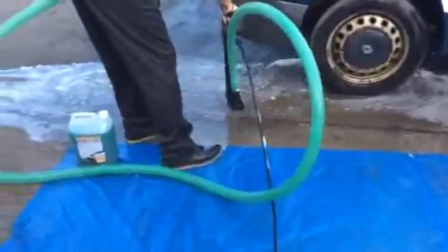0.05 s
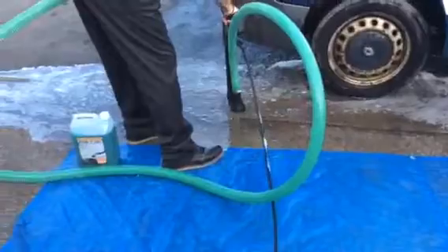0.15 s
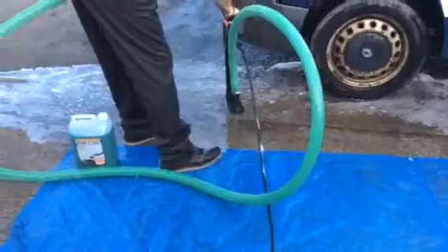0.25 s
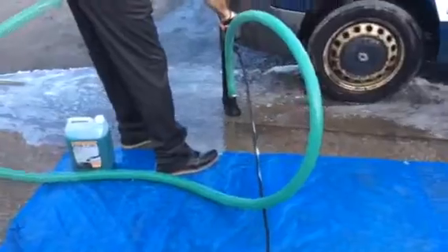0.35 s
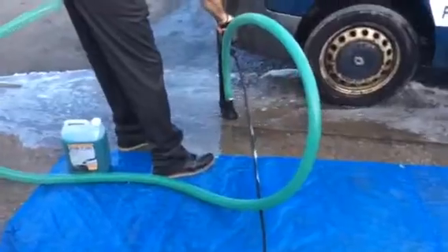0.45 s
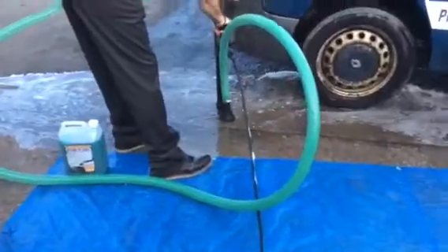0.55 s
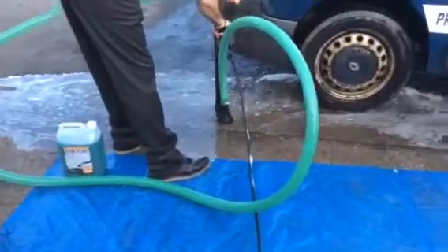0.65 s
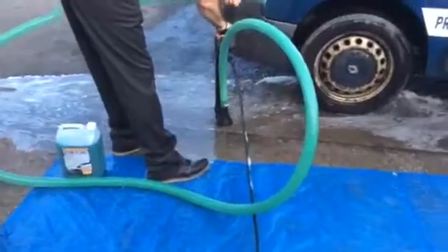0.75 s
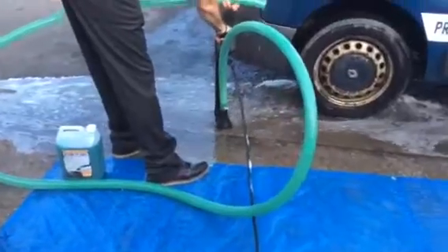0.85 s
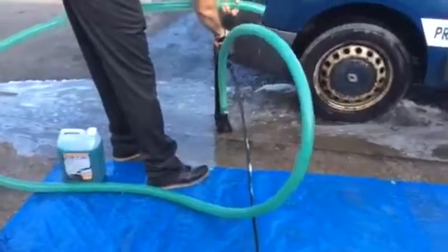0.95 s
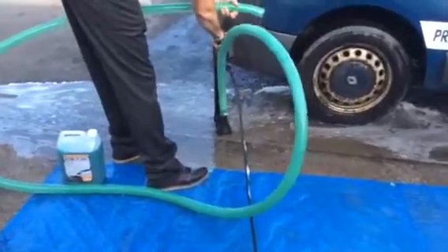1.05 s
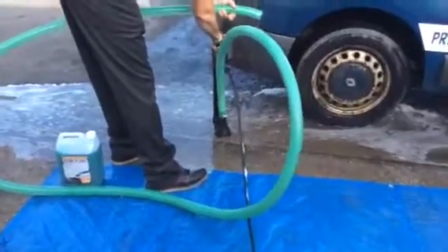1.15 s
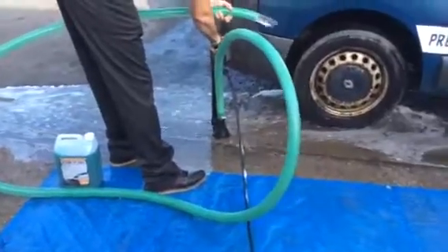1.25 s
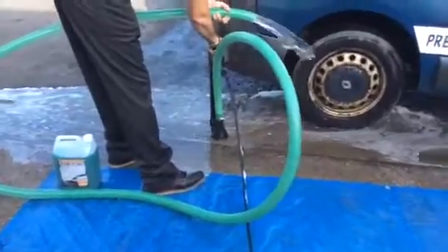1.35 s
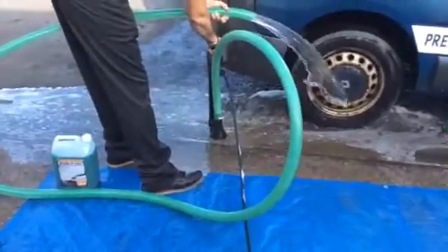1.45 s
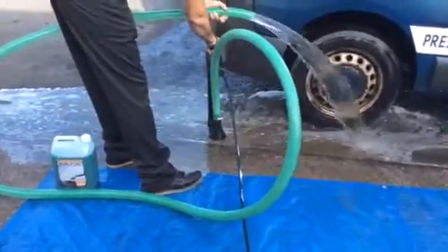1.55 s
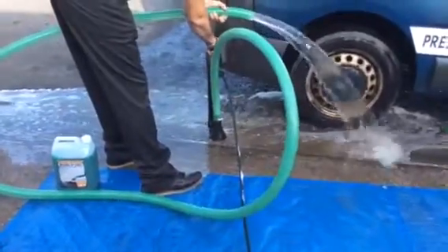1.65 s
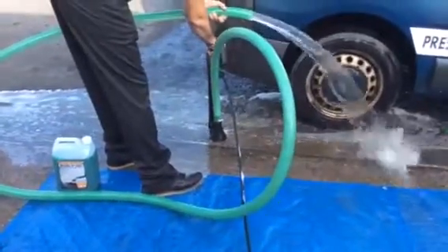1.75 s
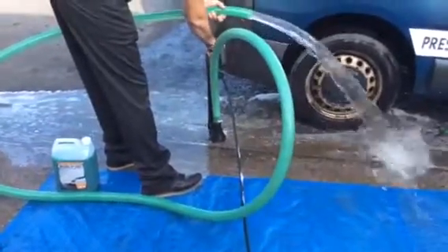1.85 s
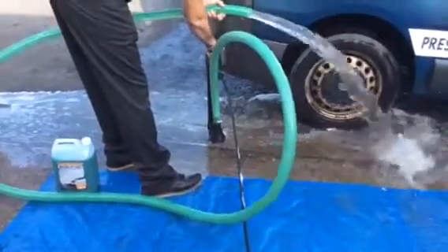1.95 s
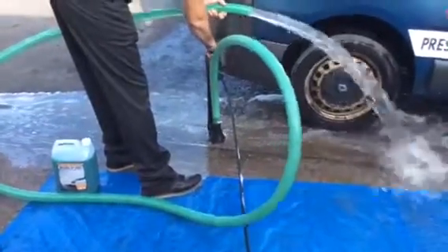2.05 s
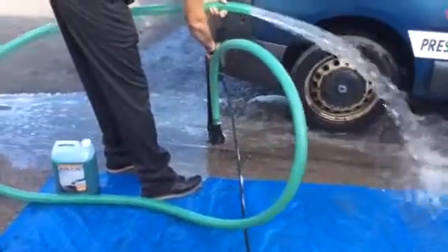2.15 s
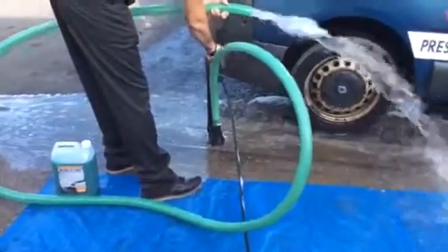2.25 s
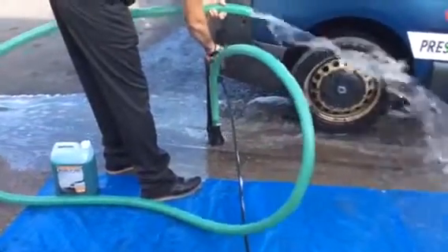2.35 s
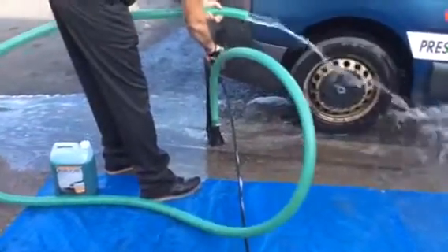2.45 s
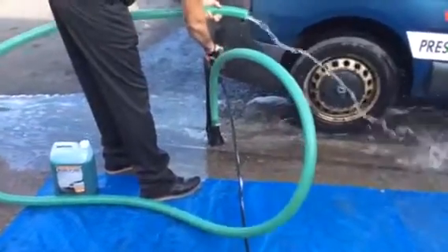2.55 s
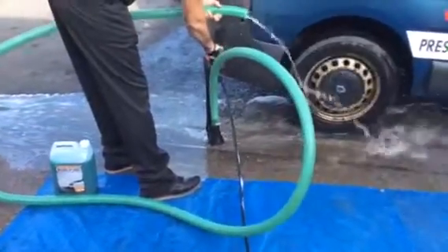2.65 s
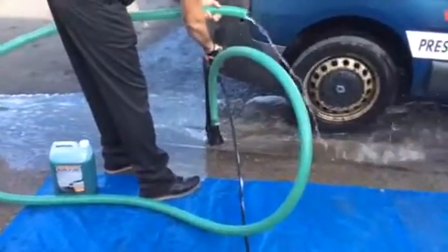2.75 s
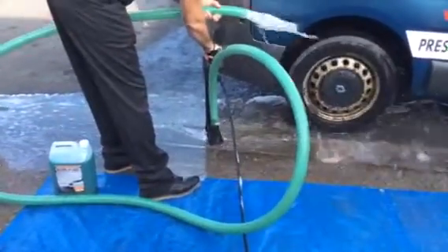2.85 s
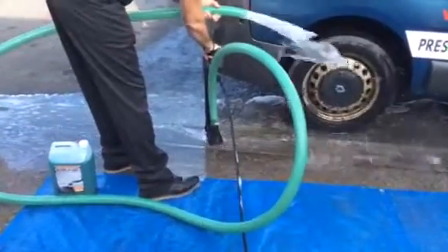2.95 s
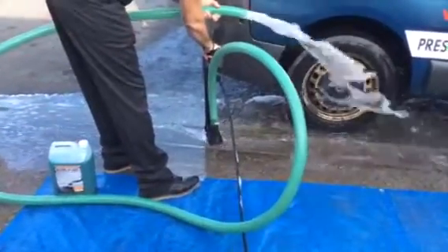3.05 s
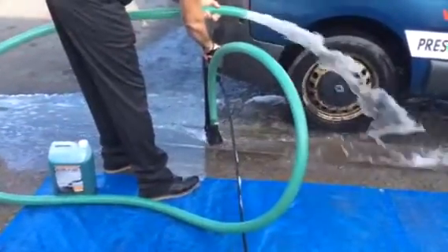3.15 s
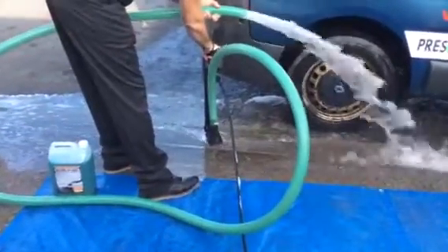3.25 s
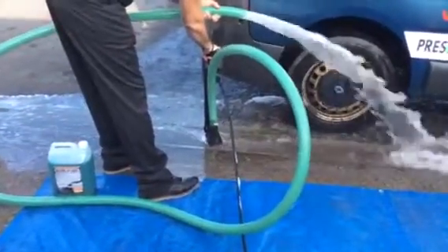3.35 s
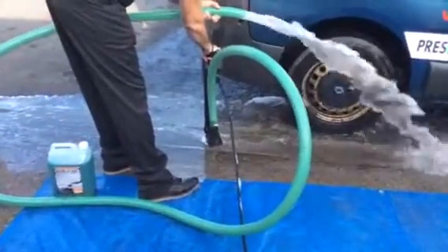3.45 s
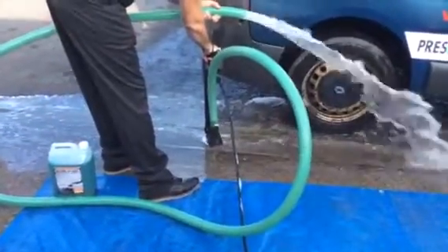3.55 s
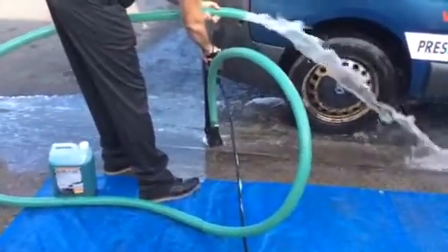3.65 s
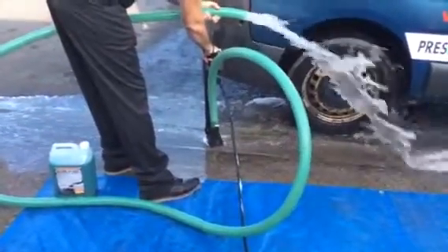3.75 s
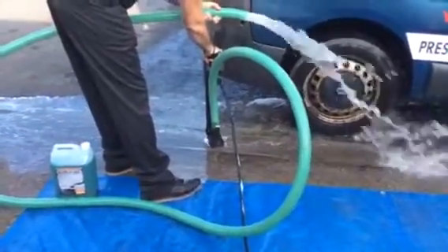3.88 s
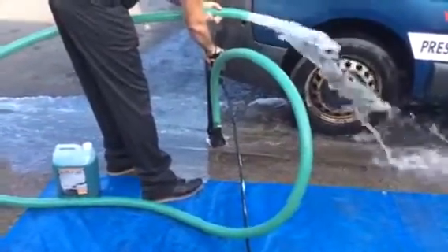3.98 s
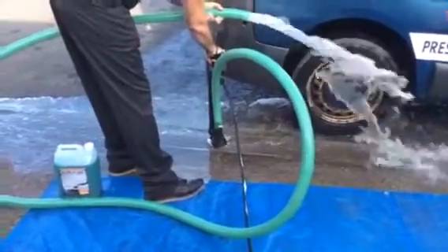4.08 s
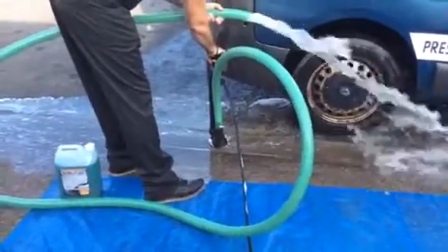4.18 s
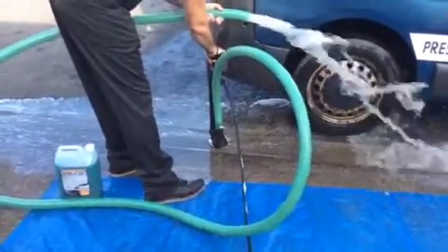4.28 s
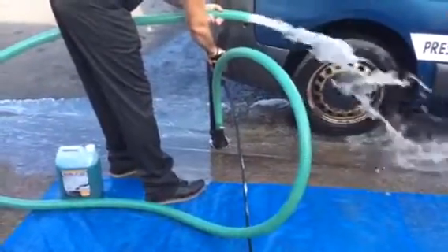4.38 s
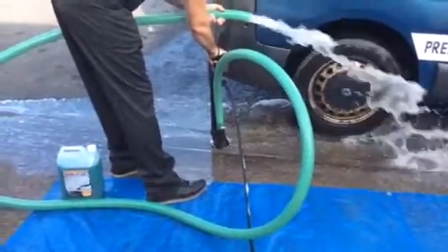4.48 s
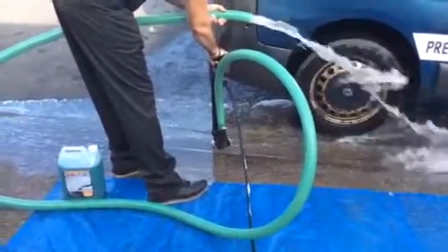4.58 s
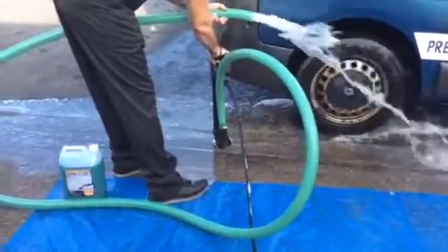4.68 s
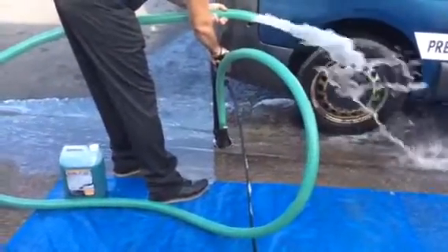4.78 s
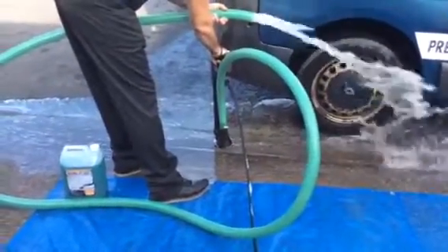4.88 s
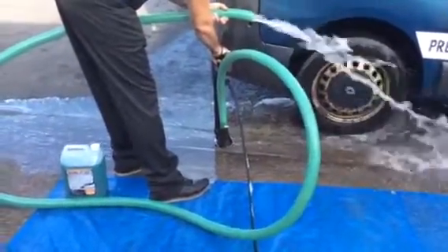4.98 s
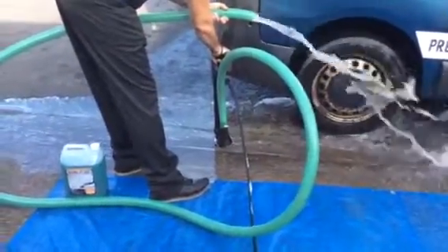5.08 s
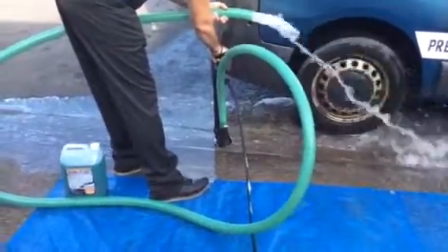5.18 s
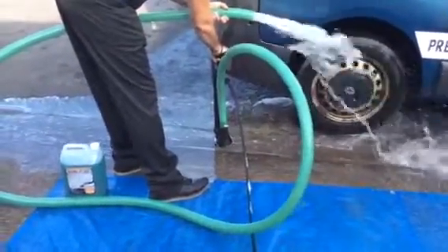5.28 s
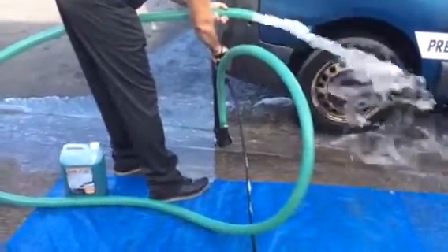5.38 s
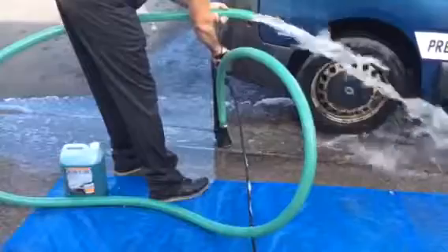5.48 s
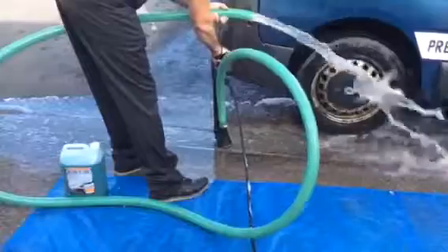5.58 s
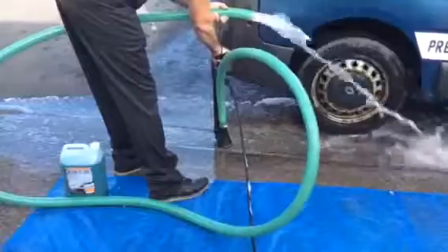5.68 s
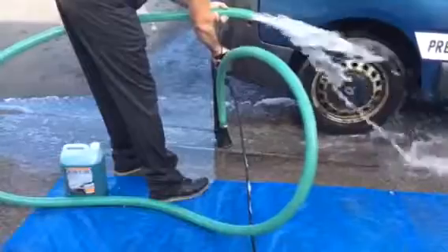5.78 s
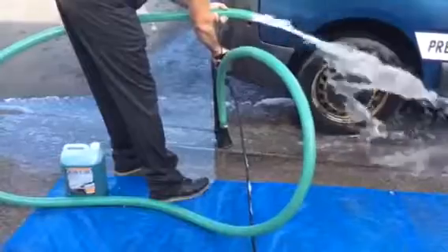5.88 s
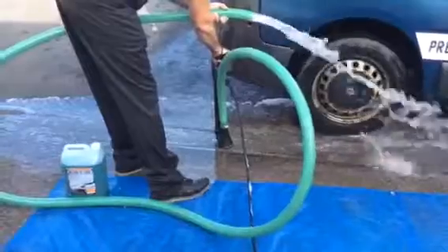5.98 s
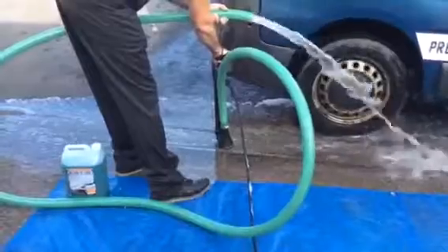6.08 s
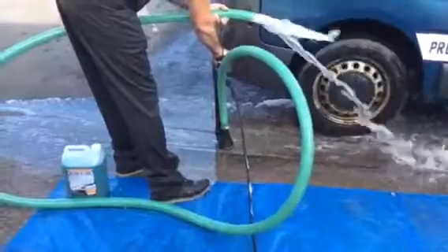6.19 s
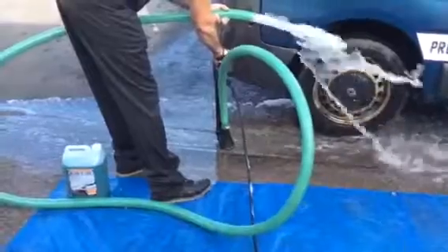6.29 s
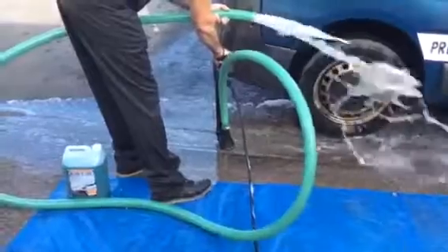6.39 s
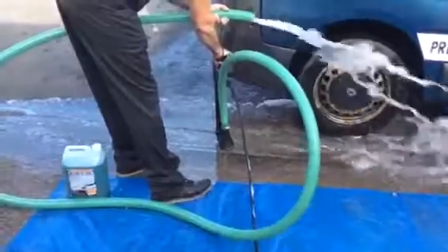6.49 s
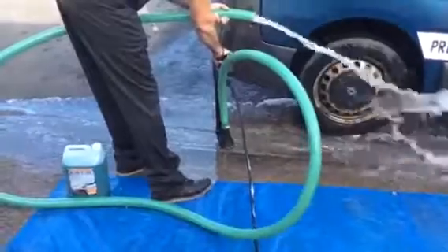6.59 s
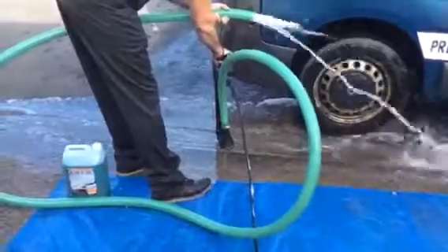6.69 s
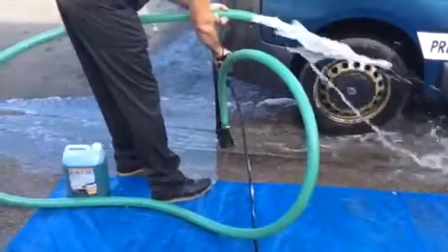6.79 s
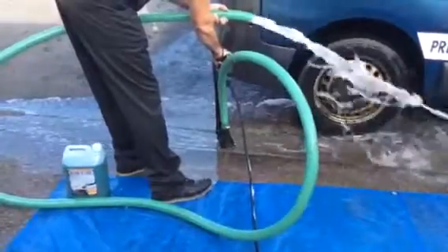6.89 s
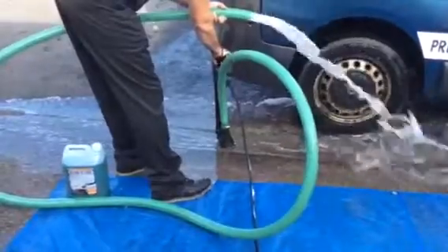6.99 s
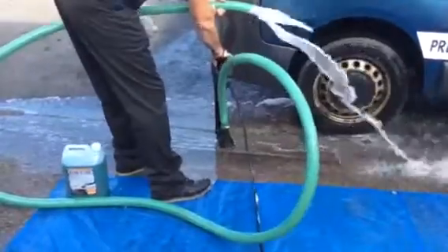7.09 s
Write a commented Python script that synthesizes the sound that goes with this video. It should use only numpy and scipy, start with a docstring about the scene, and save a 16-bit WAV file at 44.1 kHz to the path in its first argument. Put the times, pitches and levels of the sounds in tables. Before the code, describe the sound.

A pressure washer whines and hisses outdoors while a hose coughs out air, then gushes water that splatters onto wet ground.

```python
"""A pressure washer whines and hisses steadily outdoors, over a low rumble and a few soft bumps.
The motor sounds a comb of shaft harmonics; the jet, inside a sludge pump, throbs with the pistons.
Trapped air coughs out of the pump's wide hose, then water follows, gushing and splattering on wet
ground while more air pockets burst from the hose mouth in short squelches."""
import sys
import numpy as np
from scipy import signal
from scipy.fft import rfft, irfft
from scipy.io import wavfile
from scipy.ndimage import uniform_filter1d

SR = 44100
rng = np.random.default_rng(int(sys.argv[2]) if len(sys.argv) > 2 else 0)


def bounce(signal):
    """Save signal as a 16-bit WAV file at the path given by the first command-line argument."""
    frames = np.transpose(np.atleast_2d(signal))
    limited = np.clip(frames, -1, 1)
    pcm = np.round(limited * 32767).astype(np.int16)
    wavfile.write(sys.argv[1], SR, pcm)


N = 314433
TIME_S = np.arange(N) / SR
SHAFT_HZ, HOSE_RING_HZ = 47.28, 2050

# outdoor rumble spectrum: f/Hz, level/dB
RUMBLE_SPECTRUM = [(28, -36), (40, -11), (55, 2), (80, -5.5), (120, 0), (200, 0.5), (300, -1), (420, -6.5),
                   (700, -21), (3000, -70)]
# soft low bumps: t/s, level/dB, f/Hz, decay/s
BUMP_EVENTS = [(0.0, -42, 200, 0.027), (0.065, -38, 201, .07), (0.135, -37, 115, .02),
               (0.365, -41, 160, .015), (0.408, -36.5, 141, .02), (0.689, -31, 130, .008),
               (0.903, -37, 221, .012)]
# motor and piston pump lines: shaft harmonic, level/dB
WHINE_LINES = [(1, -29), (2, -20), (3, -21.5), (4, -19.5), (5, -24), (6, -19.5), (7, -19.5), (8, -22.5),
               (9, -33), (10, -15.5), (11, -9), (12, -29), (13, -1.5), (14, -4), (15, -8.5), (16, -10.5),
               (17, -1), (18, -13), (19, -36), (20, -24), (21, -8), (22, -25), (23, -13), (24, -25),
               (25, -15), (26, -13), (27, -10.5), (28, -13.5), (29, -3.5), (30, -22), (31, -0.5),
               (32, -4.5), (33, -9), (34, -3), (35, -8.5), (36, -19), (37, -25), (38, -11.5), (39, -31),
               (40, -9), (41, -5), (42, -13), (43, -4), (44, -25), (45, -21), (46, -4.5), (47, -18),
               (48, -19), (49, -3.5), (50, -28), (51, -26), (52, -8), (53, -18), (54, -18), (55, -14.5),
               (56, -17), (57, -13), (58, -10.5), (59, -15), (60, -18), (61, -17), (62, -10.5), (63, -16),
               (64, -16)]
# sparse upper lines: shaft harmonic, level/dB
WHINE_TOP_LINES = [(79, -15), (83, -18), (84, -14.5), (92, -15), (117, -13), (124, -16), (138, -28)]
# valve chatter spectrum: f/Hz, level/dB
VALVE_SPECTRUM = [(1500, -32), (2800, -9), (3300, -0.5), (4300, -3), (6400, -0.5), (9400, -8)]
# jet hiss spectrum: f/Hz, level/dB
JET_SPECTRUM = [(400, -10.5), (620, 1.5), (1100, -0.5), (2200, 5), (3200, -1.5), (4200, 1.7), (5000, -1),
                (6300, -0.8), (8000, -4), (9600, 2), (12200, -.5), (13400, 4), (15200, 3.5)]
# stream envelope: t/s, gush level/dB, spray level/dB
FLOW_ENVELOPE = [(0.95, -70, -70), (1.03, -37.5, -52), (1.18, -30.5, -32.5), (1.36, -33, -45),
                 (1.75, -27.5, -32), (2.1, -28.5, -34.0), (2.35, -25.5, -31.0), (2.58, -27.5, -28.5),
                 (2.72, -32.0, -33.5), (3.04, -32, -37.5), (3.25, -28.5, -30.5), (3.97, -29.5, -33),
                 (4.68, -27.0, -29.5), (4.98, -31.5, -33.5), (5.1, -27, -29.5), (5.97, -30.5, -36),
                 (6.18, -26.5, -29.5), (6.96, -27.5, -31), (7.13, -35.5, -35.5)]
# spectrum of water leaving the hose: f/Hz, level/dB
GUSH_SPECTRUM = [(80, -36), (200, -24), (420, -12.5), (520, -5.5), (800, -2), (1100, -2.5), (1500, 1),
                 (1750, -4), (2200, 1.5), (2550, -3.5), (3300, -8), (4500, -15.5), (7000, -30)]
# spectrum of splattering drops: f/Hz, level/dB
SPRAY_SPECTRUM = [(300, -40), (1500, -1), (3000, -2), (4000, 0), (4800, -1.5), (5600, 2), (6800, -4),
                  (9000, -7), (12000, -11.5), (15000, -5.5)]
# loud air pockets: t/s, level/dB, f/Hz, length/s
LOUD_POCKETS = [(0.821, -23.5, 1150, 0.015), (0.836, -19.5, 796, .009), (0.871, -19, 3950, 0.0085),
                (0.895, -13.5, 2290, 0.011), (0.917, -14, 2250, .011), (1.173, -17.5, 1156, 0.0102),
                (1.175, -19.5, 2250, 0.0086), (1.215, -25, 850, .011), (1.231, -21, 2500, .009),
                (1.597, -21.5, 2100, 0.0087), (1.749, -21, 2100, 0.0085), (1.985, -13.5, 1550, .011),
                (2.85, -19.5, 2000, 0.014), (2.965, -21, 2200, .01), (3.059, -19.5, 1680, 0.0048),
                (3.107, -16, 2000, 0.01), (3.247, -13.5, 2310, 0.0074), (3.389, -27, 5470, .008),
                (3.482, -20, 2280, 0.0092), (3.738, -22, 2280, .007), (3.848, -18, 2200, 0.0085),
                (3.877, -20.5, 1160, 0.01), (3.903, -23, 2765, 0.0088), (4.064, -19.5, 2280, .009),
                (4.162, -17.5, 2110, 0.0066), (4.199, -20.5, 2200, .008), (4.316, -21, 1590, 0.0072),
                (4.352, -20.5, 1160, .01), (4.463, -19.5, 2280, .011), (4.685, -17, 2070, 0.0096),
                (4.721, -18.5, 3190, 0.011), (5.069, -18, 2294, 0.0088), (5.16, -16.5, 2240, 0.0083),
                (5.321, -15, 2300, .009), (5.463, -19, 2240, 0.0089), (5.596, -21.5, 979, .014),
                (5.795, -22.5, 2110, .013), (6.061, -22.5, 1160, 0.0099), (6.215, -22, 1590, .018),
                (6.232, -17.5, 2000, 0.02), (6.284, -18.5, 2240, 0.0058), (6.365, -14, 2306, 0.0092),
                (6.476, -25, 1030, .012), (6.666, -17, 2240, 0.016), (6.764, -21.5, 2650, .011),
                (6.924, -22, 900, .01), (6.931, -18.5, 2454, 0.0075), (6.994, -21, 1980, .015),
                (7.093, -19, 3890, .006)]


def from_db(db):
    return 10 ** (np.asarray(db) / 20)


def unit_rms(x):
    return x / np.sqrt(np.mean(x ** 2) + 1e-20)


def colour(x, spectrum):
    """Filter by a spectrum interpolated over log frequency; rms 1."""
    hz, db = np.transpose(spectrum)
    bin_hz = np.maximum(np.arange(N + 1) * SR / (2 * N), 1)
    gain = from_db(np.interp(np.log(bin_hz), np.log(hz), db))
    return unit_rms(irfft(rfft(x, 2 * N) * gain)[:N])


def drift(corner_hz):
    """Slow low-passed noise; rms about 1."""
    hop = 40
    r = np.exp(-2 * np.pi * corner_hz * hop / SR)
    slow = signal.lfilter([1], [1, -2 * r, r * r], rng.standard_normal(N // hop + 2002))[2000:]
    return np.interp(np.arange(N) / hop, np.arange(len(slow)), unit_rms(slow))


def resonate(x, hz, width_hz):
    """Two-pole resonance."""
    r = np.exp(-np.pi * width_hz / SR)
    return signal.lfilter([1, 0, -1], [1, -2 * r * np.cos(2 * np.pi * hz / SR), r * r], x + 1e-18)


def grains(low_hz, high_hz, per_s, q, size_db, clump_db, clump_hz, bands):
    """Random clicks, swelling in clumps, ring a resonator bank; flat on average."""
    out = np.zeros(N)
    for hz in np.geomspace(low_hz, high_hz, bands):
        born = np.flatnonzero(rng.random(N) < per_s / bands / SR)
        click_db = size_db * np.minimum(rng.exponential(1, N)[born], 4)
        click_db += clump_db * drift(clump_hz)[born]
        clicks = np.zeros(N)
        clicks[born] = from_db(click_db) * np.sign(rng.random(N)[born] - .5)
        out += np.sqrt(hz) * unit_rms(resonate(clicks, hz, hz / q))
    return out


def burst(age, attack, decay=1.46):
    """Fast rise, slower fall, peak 1 at age 0; age in burst lengths."""
    age = np.clip(age, -20, 20)
    swell = 1 / (decay * np.exp(-attack * age) + attack * np.exp(decay * age))
    return swell / np.max(swell)


def rumble(level_db=-49.5, gust_db=2.5):
    """Low, lumpy outdoor noise."""
    return from_db(level_db + gust_db * drift(8.1)) * colour(rng.standard_normal(N), RUMBLE_SPECTRUM)


def bumps(rise_s=.003):
    """Soft bumps, each a damped low sine."""
    out, age_s = np.zeros(N), TIME_S[:SR // 2]
    for start_s, level_db, hz, decay_s in BUMP_EVENTS:
        envelope = from_db(level_db) * np.tanh(age_s / rise_s) * np.exp(-age_s / decay_s)
        out[round(start_s * SR) + np.arange(len(age_s))] += envelope * np.sin(2 * np.pi * hz * age_s)
    return out


def motor_whine(turns, level_db=-33.5, flutter_db=1.0, scatter_cycles=.15, sweep_lines_per_turn=14):
    """Shaft harmonics of motor and pump; each band throbs once a turn, higher bands later."""
    flutters = [from_db(flutter_db * drift(5)) for _ in range(5)]
    lines = np.zeros(N)
    for i, (k, line_db) in enumerate(WHINE_LINES + WHINE_TOP_LINES):
        cycles = k * turns - k * k / (2 * sweep_lines_per_turn) + scatter_cycles * rng.standard_normal()
        lines += from_db(line_db) * flutters[i % 5] * np.sin(2 * np.pi * cycles)
    return from_db(level_db) * unit_rms(lines)


def each_turn(pattern, turns):
    """Loop a pattern once per shaft turn."""
    return np.interp(turns % 1, np.linspace(0, 1, len(pattern)), pattern)


def valve_rattle(turns, level_db=-46.0, stroke_db=-0.5):
    """Pump valves repeat one bright chatter every turn, rippling with the three strokes."""
    chatter = each_turn(signal.resample(rng.standard_normal(400), 1600), turns)
    ripple = from_db(stroke_db * np.cos(2 * np.pi * 3 * turns))
    return from_db(level_db) * colour(chatter * ripple, VALVE_SPECTRUM)


def jet_hiss(turns, level_db=-32.5, throb_db=2.5, snap_db=1.5, piston_db=.1, uneven_db=1.5,
             sputter_db=1.4):
    """Three pistons send six pressure ripples a turn through the nozzle; the hiss swells on each."""
    stroke = 2 * np.pi * 3 * turns
    ripple_db = piston_db * np.cos(stroke) + throb_db * np.cos(2 * stroke) + snap_db * np.cos(4 * stroke)
    ripple_db += uneven_db * each_turn(unit_rms(rng.standard_normal(40)), turns)
    ripple_db += sputter_db * drift(10)
    return from_db(level_db) * colour(rng.standard_normal(N) * from_db(ripple_db), JET_SPECTRUM)


def yard_echo(x, echo_db=-12.0, t60_s=0.16, lowpass_hz=5000):
    """Ground, car body and walls scatter back a short, dull tail."""
    age_s = TIME_S[:SR // 3]
    tail = rng.standard_normal(len(age_s)) * from_db(-60 * age_s / t60_s) * (age_s > .004)
    tail = signal.sosfilt(signal.butter(1, lowpass_hz, fs=SR, output="sos"), tail / np.linalg.norm(tail))
    return x + from_db(echo_db) * signal.fftconvolve(x, tail)[:N]


def hose_ring(x, width_hz=91, boost_db=2.47):
    """The hose mouth adds its hollow resonance to all that leaves it."""
    return x + (from_db(boost_db) - 1) * np.pi * width_hz / SR * resonate(x, HOSE_RING_HZ, width_hz)


def splats(per_s=50, depth=0.69, decay_s=0.0094):
    """Gain that jumps and sinks as each blob hits the ground; rms 1."""
    hits = (rng.random(N) < per_s / SR) * rng.random(N)
    r = np.exp(-1 / (decay_s * SR))
    return unit_rms(1 + depth * signal.lfilter([1], [1, -r], hits + 1e-18))


def water_stream(trim_db=-3.0, lump_db=1.95, surge_db=1.07):
    """The pump surges; water lands in lumps, with low bubbles and a bright crackle of drops."""
    flow_s, gush_db, spray_db = np.transpose(FLOW_ENVELOPE)
    lumps = from_db(lump_db * drift(28) + surge_db * drift(3))
    bubbles = grains(300, 4980, per_s=5000, q=11.9, size_db=3.0, clump_db=2.5, clump_hz=29, bands=24)
    drops = grains(2226, 14550, per_s=6000, q=9, size_db=2.5, clump_db=4.0, clump_hz=35, bands=14)
    gush = from_db(np.interp(TIME_S, flow_s, gush_db)) * colour(bubbles, GUSH_SPECTRUM)
    spray = from_db(np.interp(TIME_S, flow_s, spray_db)) * colour(drops, SPRAY_SPECTRUM)
    return from_db(trim_db) * lumps * splats() * (gush + spray)


def small_pockets(count=27, hose_full_s=1.3, over_db=2.5, centre_hz=2000, spread_oct=1.3, length_s=.00803):
    """Small air pockets at uneven gaps, level following the gush; rows as LOUD_POCKETS."""
    place, pitch = rng.random((2, count))
    times_s = hose_full_s + (TIME_S[-1] - hose_full_s) * (np.arange(count) + place) / count
    flow_s, gush_db, _ = np.transpose(FLOW_ENVELOPE)
    level_db = np.interp(times_s, flow_s, gush_db) + over_db
    hz = centre_hz * 2 ** (spread_oct * (2 * pitch - 1))
    return list(zip(times_s, level_db, hz, np.full(count, length_s)))


def pocket_note(age, hz, glide_hz=280, width_hz=276, rasp_exponent=.7):
    """An air pocket tears open; its rough note sinks as the cavity grows. Age in burst lengths."""
    swell = burst(age + 0.078, attack=5.8)
    r = np.exp(-np.pi * width_hz / SR)
    complex_noise = [1, 1j] @ rng.standard_normal((2, len(age)))
    turbulence = uniform_filter1d(signal.lfilter([1], [1, -r], complex_noise), int(SR / hz) + 1)
    turbulence *= np.abs(turbulence) ** (rasp_exponent - 1)
    pitch_hz = hz - glide_hz * np.tanh(age / 2)
    note = swell * np.real(turbulence * np.exp(2j * np.pi * np.cumsum(pitch_hz) / SR))
    return note * np.sqrt(np.sum(swell ** 2) / np.sum(note ** 2))


def air_spurts(note_trim_db=-2.5, mist_trim_db=-22.5, mist_db_per_oct=8.5, mist_lead_s=0.004):
    """Pockets burst from the hose mouth, each with a note and a puff of mist twice as long."""
    notes, puff_power = np.zeros(N), np.zeros(N)
    offsets = np.arange(-1500, 3500)
    age_s = offsets / SR
    for time_s, level_db, hz, length_s in LOUD_POCKETS + small_pockets():
        at = np.minimum(round(time_s * SR) + offsets, N - 1)
        notes[at] += from_db(level_db + note_trim_db) * pocket_note(age_s / length_s, hz)
        puff_db = mist_trim_db + 0.51 * level_db + mist_db_per_oct * np.log2(hz / HOSE_RING_HZ)
        puff = burst((age_s + mist_lead_s) / (2 * length_s), attack=7.0)
        puff_power[at] += (from_db(puff_db) * puff) ** 2
    highpass = signal.butter(2, 400, "high", fs=SR, output="sos")  # a small mouth radiates no bass
    mist = grains(2030, 14000, per_s=9000, q=18, size_db=2.0, clump_db=2.5, clump_hz=42, bands=14)
    return signal.sosfilt(highpass, notes) + np.sqrt(puff_power) * colour(mist, SPRAY_SPECTRUM)


def scene():
    """Washer locked to one shaft, hose outflow with its echo, background; mono."""
    turns = np.cumsum(SHAFT_HZ * (1 + 0.000399 * drift(3))) / SR
    washer = motor_whine(turns) + valve_rattle(turns) + jet_hiss(turns)
    outflow = yard_echo(hose_ring(water_stream() + air_spurts()))
    return (washer + outflow + rumble() + bumps())[None]


def record(dry, threshold_db=-21.0, slope=0.89, smooth_s=0.023, release_db_per_s=3.5, cutoff_hz=15350):
    """Gain control ducks after loud spurts and recovers slowly; steep low-pass."""
    level_db = 10 * np.log10(uniform_filter1d(dry[0] ** 2, size=900) + 1e-12)
    cut_db = np.maximum(level_db - threshold_db, 0) * slope
    release_db = release_db_per_s * TIME_S
    held_db = np.maximum.accumulate(cut_db + release_db) - release_db
    r = np.exp(-1 / (smooth_s * SR))
    ducked = dry * from_db(-signal.lfilter([1 - r], [1, -r], held_db))
    return signal.sosfilt(signal.ellip(12, .2, 80, cutoff_hz, fs=SR, output="sos"), ducked)


dry = scene()
out = record(dry)
bounce(out)
```